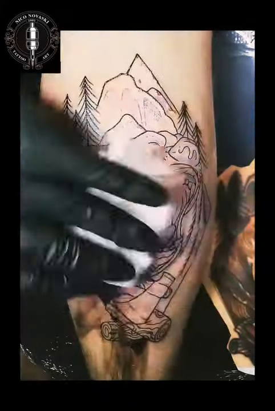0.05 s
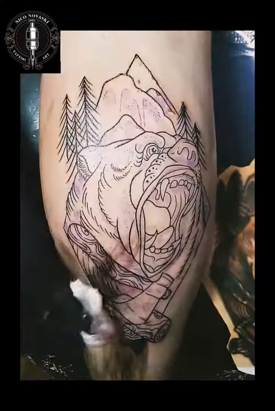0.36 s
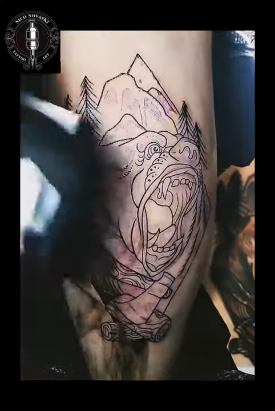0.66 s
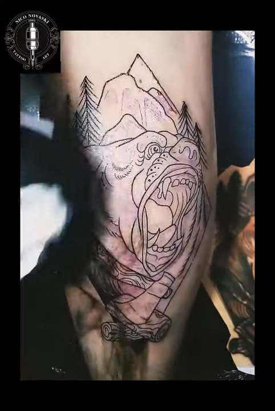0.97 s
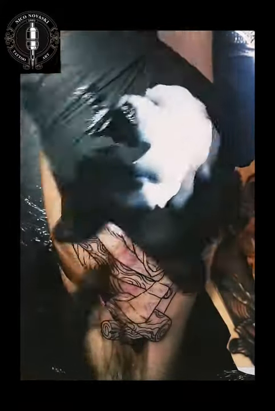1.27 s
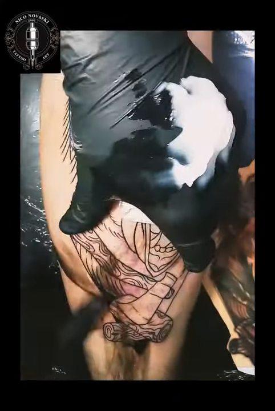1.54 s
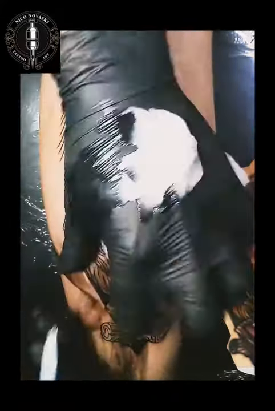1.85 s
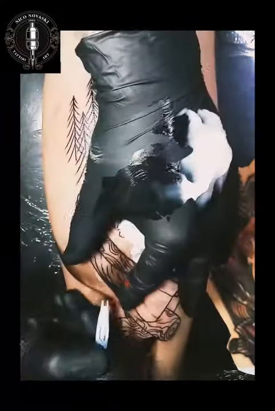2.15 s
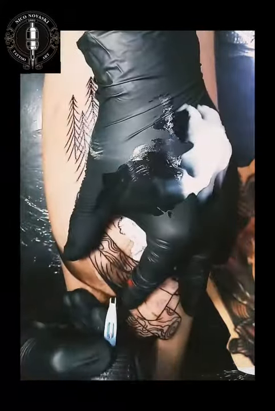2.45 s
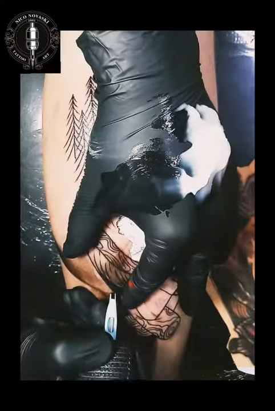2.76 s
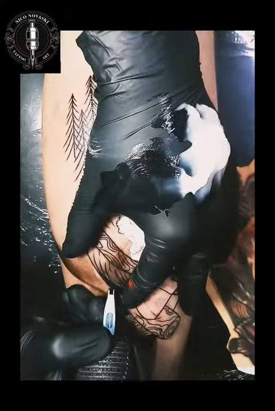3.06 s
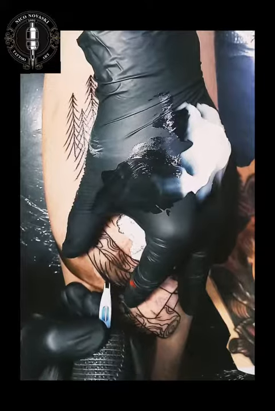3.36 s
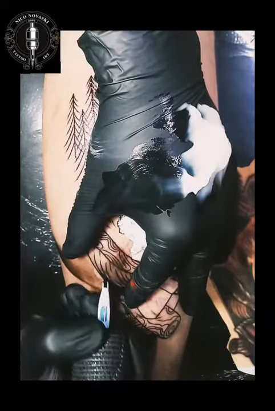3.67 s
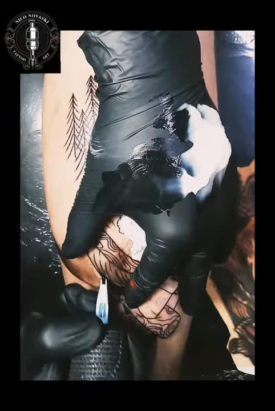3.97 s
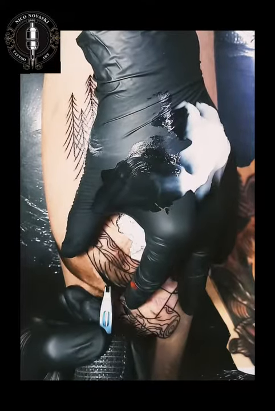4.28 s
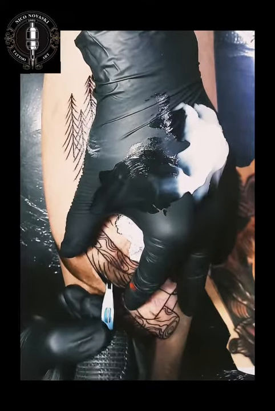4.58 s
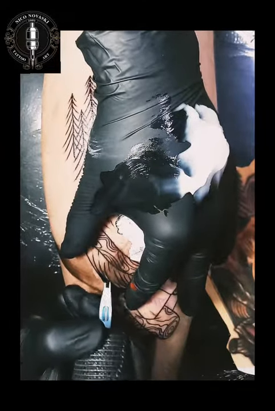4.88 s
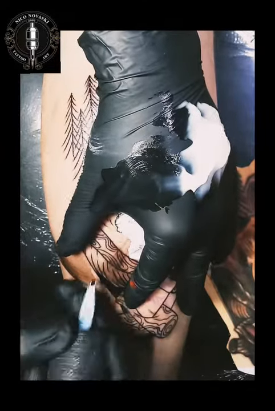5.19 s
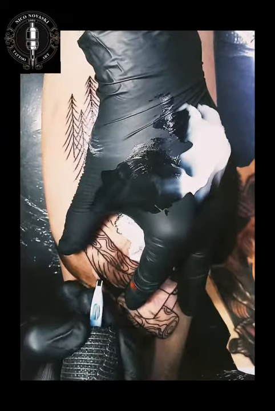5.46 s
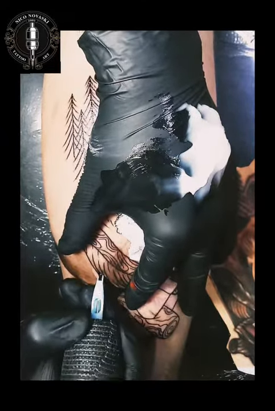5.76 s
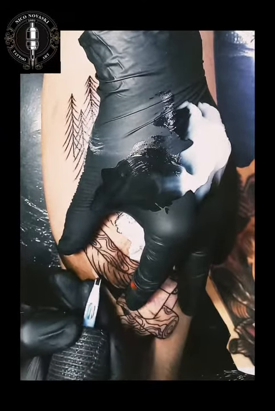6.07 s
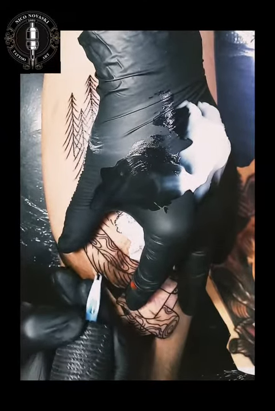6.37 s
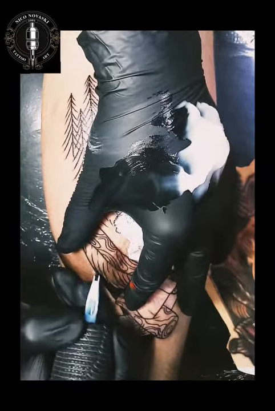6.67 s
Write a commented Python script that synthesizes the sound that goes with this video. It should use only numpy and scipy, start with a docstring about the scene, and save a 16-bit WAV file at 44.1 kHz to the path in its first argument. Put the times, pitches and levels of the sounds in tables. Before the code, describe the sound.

Close, continuous buzz of a coil tattoo machine with a ringing whine, turning slightly rougher whenever the needle presses into skin.

```python
"""A small room, where a coil tattoo machine buzzes: beside the microphone, held up, then on the skin.
Its armature strikes the frame about 96 times a second and rings it in the treble, and the colour
shifts as the hand turns and carries it. Skin shortens the stroke, so the buzz turns faster and
rougher with each dab of the needle. Underneath are soft bumps on the bench, faint air and mains hum."""
import sys
import numpy as np
from scipy import signal
from scipy.fft import rfft, irfft
from scipy.io import wavfile
from scipy.ndimage import uniform_filter1d

SR = 44100
rng = np.random.default_rng(int(sys.argv[2]) if len(sys.argv) > 2 else 0)


def materialize(psi):
    """Save the field psi as 16-bit PCM at rate SR to the path in sys.argv[1].

    A 1-D psi becomes a single channel; in a 2-D psi each row is a channel.
    """
    bounded = np.clip(np.atleast_2d(psi).T, -1, 1)
    quanta = np.round(bounded * 32767).astype(np.int16)
    wavfile.write(sys.argv[1], SR, quanta)


N = 301203
TIME = np.arange(N) / SR


def gain_of(db):
    """Decibels to gain."""
    return 10 ** (np.asarray(db) / 20)


def unit_rms(x):
    """Scales to an rms of one."""
    return x / np.sqrt(np.mean(x ** 2) + 1e-20)


def curve_at(points, hz):
    """Reads an EQ curve of (Hz, dB) points on a log-frequency axis."""
    point_hz, db = np.transpose(points)
    return np.interp(np.log(hz + 1), np.log(point_hz + 1), db)


def coloured_noise(points):
    """White noise through an EQ curve."""
    gain = gain_of(curve_at(points, np.fft.rfftfreq(N, 1 / SR)))
    return irfft(rfft(rng.standard_normal(N)) * gain, N)


def bandpass(x, low_hz, high_hz):
    """A gentle band filter."""
    return signal.sosfilt(signal.butter(2, [low_hz, high_hz], "band", fs=SR, output="sos"), x)


def bell(x, centre, width):
    """A smooth hump of height one."""
    return np.exp(-((x - centre) / width) ** 2)


def gate(t, start, end, ramp):
    """One between start and end, with sloping edges."""
    return np.clip(.5 + (t - start) / ramp, 0, 1) - np.clip(.5 + (t - end) / ramp, 0, 1)


def minimum_phase(gain):
    """Gives a magnitude the phase of something that rings only after it is struck."""
    log_gain = np.log(np.maximum(gain, 1e-5))
    mirrored = np.r_[log_gain, log_gain[-2:0:-1]]
    return np.exp(np.conj(signal.hilbert(mirrored)))[:len(gain)]


# The armature stumbles now and then. Each row: time in seconds, how early in ms, level change in dB.
STUMBLES = [(.859, 1.35, -2), (.870, 1.5, -1.5), (1.675, 1.35, -5), (3.697, 1.8, -4), (4.057, 0.14, -6),
            (4.097, 1.8, 0.5), (6.706, 1.8, -3)]

def armature_blows(cycles, load, jitter_ms=0.0057, skin_jitter_ms=0.014, drift_ms=0.018):
    """One sharp blow a cycle; skin roughens their timing and evens out their force."""
    times = np.interp(np.arange(np.ceil(cycles[0]), cycles[-1]), cycles, TIME)
    pressed = np.interp(times, TIME, load)
    jitter, drift, force = rng.standard_normal((len(times), 3)).T
    late_ms = jitter * (jitter_ms + skin_jitter_ms * pressed)
    late_ms += drift_ms * unit_rms(uniform_filter1d(drift, size=5))
    times += late_ms / 1000
    force_db = force * (0.8 - 0.69 * pressed)
    for at, early_ms, db in STUMBLES:
        nearest = np.argmin(abs(times - at))
        times[nearest] -= early_ms / 1000
        force_db[nearest] += db
    # a windowed sinc lets each blow land between samples
    taps = np.round(times * SR).astype(int)[:, None] + np.arange(-10, 11)
    offset = taps - times[:, None] * SR
    blows = gain_of(force_db)[:, None] * np.sinc(offset) * np.sinc(offset / 10)
    return np.bincount(np.clip(taps, 0, N - 1).ravel(), blows.ravel(), N)


def needle_scrape(cycles, load, fade_cycles=0.077):
    """The needle bar rubs in its tube after each blow, harder when it is in the skin."""
    grit = coloured_noise([(3500, 10.5), (7000, -6.5), (9000, 10), (15000, 9.5)])
    rub = unit_rms(0.24 + np.exp(-(cycles % 1) / fade_cycles))
    return grit * rub * (gain_of(-48) + gain_of(-49) * load)


def knock_cluster(pattern, start_ms, fade_ms):
    """A dying cluster of small knocks, as a spectrum of mean power one."""
    age_ms = np.arange(len(pattern)) / SR * 1000 - start_ms
    knocks = pattern * (age_ms > 0) * np.exp(-abs(age_ms) / fade_ms)
    return rfft(knocks / np.linalg.norm(knocks))


# The frame's metallic rings. Each row: pitch in Hz, width in Hz, then relative level in dB
# for each grip: beside the microphone, held up, on the skin.
FRAME_MODES = [(974, 47, -20.5, -40, -22), (1128, 160, -25.5, -29, -24.5), (1435, 56, -22, -40, -45),
               (2328, 146, -27, -20.5, -26.5), (2483, 53, -19, -26, -27), (3260, 740, -18, -25, -41),
               (3330, 144, -25, -19, -17.5), (4740, 270, -4, -11, -6.5), (5234, 520, -5.5, -14.5, -12.5),
               (5933, 88, 3, -8.5, 1), (6510, 990, -30, -6, -28), (6832, 720, -1, -1, -4),
               (10309, 240, -9, -16.5, -24), (11020, 790, -13, -18, -21.5), (14700, 280, -10.5, -16, -30),
               (15350, 2600, -12.5, -18.5, -18.5)]
# The bare crack of a stroke. Each row: frequency in Hz, relative level in dB.
CRACK_EQ = [(60.0, -51), (250.0, -40.5), (600.0, -36.5), (1900.0, -32), (3000.0, -36.5), (3400.0, -20),
            (5600.0, -17), (7300.0, -30.5), (7900.0, -22), (9500.0, -18), (12200.0, -25.5),
            (13300.0, -32.5), (16000.0, -26.5)]
# The mix of a stroke in those three grips. Each row: start in seconds, trims in dB for crack, bounce,
# rattle, room and spring click, then the click's delay in ms.
GRIPS = [(0, -3, -6.5, 4.5, 0, -7.5, 5.3), (0.631, -4.5, 2, -2, -0.5, 1.5, 7.9),
         (2.05, 0.5, 1.5, -1, -1, 6, 8.2)]

def stroke_ring(grip_mix, patterns):
    """One stroke: blow, bounce, rattle, room echoes and spring click, all through the frame's modes."""
    _, crack_db, bounce_db, rattle_db, room_db, spring_db, spring_ms = grip_mix @ np.array(GRIPS)
    hz = np.fft.rfftfreq(patterns.shape[1], 1 / SR)

    def eq(db, points):
        return gain_of(db + curve_at(points, hz))

    power = eq(crack_db, CRACK_EQ) ** 2
    for mode_hz, width, *mode_db in FRAME_MODES:
        power += grip_mix @ gain_of(mode_db) ** 2 / (1 + (2 * (hz - mode_hz) / width) ** 2) ** 2
    blow = eq(0, [(7000, 1), (9500, 2.5), (14000, -3)])
    bounce = knock_cluster(patterns[0], start_ms=.3, fade_ms=0.43)
    bounce *= eq(bounce_db, [(7000, 2), (9000, 1.5), (15000, -1.5)])
    rattle = knock_cluster(patterns[1], start_ms=.4, fade_ms=3.07)
    rattle *= eq(rattle_db, [(6500, 0), (9000, -14.5), (15000, -11)])
    echoes = knock_cluster(patterns[2], 1.3, 21.2) + 0.63 * knock_cluster(patterns[3], 7.6, 47)
    echoes *= eq(room_db, [(800, 2.5), (2000, 4), (5000, -11), (10000, -3.5)])
    spring = knock_cluster(patterns[0], start_ms=spring_ms - .3, fade_ms=1.04)
    spring *= eq(spring_db, [(6500, -9.5), (10500, -11), (14500, -3)])
    knocks = blow + bounce + rattle + echoes + spring
    # the knocks share out the stroke's energy in time; the modes decide its colour
    knock_power = uniform_filter1d(abs(knocks) ** 2, size=25)
    return irfft(knocks * minimum_phase(np.sqrt(power / knock_power)))


# The hand carries the machine. Each row: time in seconds, distance in wavelengths of the ring.
HAND_PATH = [(0, -0.5), (.55, 0.22), (.9, 1), (1.8, 4.5), (2.4, 9), (2.9, 10), (5.1, 10.5), (5.35, 12),
             (5.65, 12.5), (6.1, 14), (6.83, 16)]

def carried_frame(drive, size=4096):
    """Rings the frame as it moves: the grip changes, and each wavelength of travel renews the echoes."""
    hop = size // 2
    places = rng.standard_normal((20, 4, size))
    padded, out = np.pad(drive, (hop, size)), np.zeros(N + 4 * size)
    for at in range(0, N + hop, hop):
        now = at / SR
        lifted = np.clip(.5 + (now - GRIPS[1][0]) / 0.17, 0, 1)
        landed = np.clip(.5 + (now - GRIPS[2][0]) / 0.35, 0, 1)
        grip_mix = np.array([1 - lifted, lifted * (1 - landed), landed])
        distance = np.interp(now, *np.transpose(HAND_PATH))
        place, blend = divmod(np.clip(distance, 0, len(places) - 2), 1.0)
        patterns = (1 - blend) * places[int(place)] + blend * places[int(place) + 1]
        grain = padded[at:at + size] * signal.windows.hann(size, sym=False)
        out[at:at + 2 * size - 1] += signal.fftconvolve(grain, stroke_ring(grip_mix, patterns))
    return out[hop:hop + N]


# Skin damps the frame. Each row: frequency in Hz, gain in dB at firm pressure.
SKIN_DAMPING = [(1000, -3), (2000, -1.5), (3500, -.8), (4700, -0.5), (5400, -3), (6000, 0.5), (7000, -1),
                (9000, -1.75), (15000, -1.5)]
# The whine, the frame's strongest rings, rides the turning hand. Each row: time in seconds, gain in dB.
WHINE_RIDE = [(0, 1), (.3, -0.5), (1.35, 0), (2.2, -.5), (2.6, 0), (3.5, -5.5), (4.9, -4.5), (5.15, -5),
              (5.3, -1.5), (6.1, 3.5), (6.83, 1)]
# A ring stands out or sinks while the frame is held a certain way.
# Each row: start and end in seconds, centre and width in Hz, gain in dB.
HELD_ANGLES = [(0, 0.636, 2310, 190, 9.5), (0, .6, 4840, 450, 1), (0.71, 2.38, 2300, 240, -4.5),
               (0.693, 1.334, 4200, 650, -6.5), (1.358, 2.122, 5460, 402.5, 4.5),
               (2.41, 2.788, 1550, 900, 2.5), (2.5, 5.92, 5420, 353, -7.5), (5.274, 5.964, 6450, 210, 5),
               (6.015, 6.353, 2420, 220, 2.5), (6.01, 6.9, 5350, 450, 1.5)]
# A ring flares or drops out as the frame swings past the microphone.
# Each row: midpoint and length in seconds, centre and width in Hz, gain in dB.
SWINGS = [(0.644, .07, 5200, 700, -5), (.77, 0.19, 4960, 550, 9), (0.777, 0.084, 7060, 600, -1.5),
          (0.794, 0.098, 13900, 5000, -4), (0.964, 0.078, 4800, 300, 11.5), (1.075, .11, 4800, 544.6, 0),
          (1.21, 0.11, 4850, 300, 10), (1.27, .09, 5750, 450, -2), (1.935, 0.17, 4940, 300, 10),
          (1.96, 0.15, 3860, 446, -7), (2.247, 0.38, 4930, 400, -5.5), (2.53, 0.068, 6200, 1800, 3),
          (4.32, 0.11, 6070, 1500, 3), (5.213, 0.09, 5730, 1500, 4.5), (6.105, 0.1, 6300, 1100, 2.5)]

def hand_and_skin_eq(frame, load, swirl_db=1.9, ramp_s=0.02):
    """Skin damps the rings; the turning hand makes them swell, fade and swirl."""
    hz, t, spectra = signal.stft(frame, SR, nperseg=512, noverlap=384)
    db = np.outer(curve_at(SKIN_DAMPING, hz), np.interp(t, TIME, load))
    db += np.outer(bell(hz, centre=6860, width=320), np.interp(t, *np.transpose(WHINE_RIDE)))
    for start, end, centre, width, boost in HELD_ANGLES:
        db += boost * np.outer(bell(hz, centre, width), gate(t, start, end, ramp_s))
    for at, length, centre, width, boost in SWINGS:
        db += boost * np.outer(bell(hz, centre, width), bell(t, at, length / 2))
    # the colour swirls in patches while the machine travels through the air
    patch_shape = np.outer(np.hanning(7), np.hanning(45))
    patches = signal.fftconvolve(rng.standard_normal(spectra.shape), patch_shape, "same")
    db += swirl_db * unit_rms(patches) * gate(t, start=.62, end=2.3, ramp=ramp_s)
    return signal.istft(spectra * gain_of(db), nperseg=512, noverlap=384)[1][:N]


# The buzz with the needle in the air; the coils slow a little as they run.
# Each row: time in seconds, strokes per second.
FREE_SPEED = [(0, 95.86), (1.9, 95.82), (2.4, 95.63), (6.83, 95.38)]

def tattoo_machine(frame_db=20, load_rise_hz=2.7):
    """Strokes ring the frame; under load they come faster and the skin drums along."""
    load = needle_pressure()
    stroke_hz = np.interp(TIME, *np.transpose(FREE_SPEED)) + load_rise_hz * load
    cycles = np.cumsum(stroke_hz) / SR - .55
    blows = armature_blows(cycles, load)
    frame = carried_frame(blows + needle_scrape(cycles, load))
    frame = hand_and_skin_eq(frame, load)
    # the small frame radiates little bass
    frame = signal.sosfilt(signal.butter(2, 430, "high", fs=SR, output="sos"), frame)
    return gain_of(frame_db) * frame + loose_parts(blows) + skin_drum(blows, load)


# A bed of still room air. Each row: frequency in Hz, relative level in dB.
AIR_EQ = [(20, 3.5), (45, -3), (100, 5), (170, 0.5), (500, -6.5), (1500, -2.5), (5000, -20), (16000, -49)]

def room_tone(air_db=-62, mains_db=-75, octave_db=-79):
    """Faint air, with 50 Hz mains hum and its octave."""
    phase = 2 * np.pi * 50 * TIME
    hum = np.sqrt(2) * (gain_of(mains_db) * np.sin(phase) + gain_of(octave_db) * np.sin(2 * phase))
    return gain_of(air_db) * unit_rms(coloured_noise(AIR_EQ)) + hum


# Soft, dull thuds. Each row: midpoint in seconds, level in dB, centre in Hz, length in seconds.
BENCH_BUMPS = [(0.11, -52.5, 216, 0.36), (4.65, -52.5, 179, 0.07), (4.773, -53.5, 314, 0.09),
               (6.456, -58, 400, 0.085)]

def bench_bumps():
    """Hands and arms push on the bench's padding, each a short swell of low noise."""
    out = np.zeros(N)
    for at, db, hz, length in BENCH_BUMPS:
        thud = bandpass(rng.standard_normal(N), hz / 1.84, hz * 1.78)
        out += gain_of(db) * unit_rms(thud) * bell(TIME, at, length / 2)
    return out


# Loose parts hum along while the machine is held up.
# Each row: start and end in seconds, pitch and half-width in Hz, level in dB.
LOOSE_PARTS = [(.66, 1.86, 753, 59, -51), (1.2, 1.84, 2340, 49.6, -50)]

def loose_parts(blows, ramp_s=0.034):
    """Each loose part is one narrow resonance, shaken by the strokes."""
    out = np.zeros(N)
    for start, end, hz, half_width, db in LOOSE_PARTS:
        hum = unit_rms(bandpass(blows, hz - half_width, hz + half_width))
        out += gain_of(db) * gate(TIME, start, end, ramp_s) * hum
    return out


# The needle digs into the skin. Each row: start and end in seconds, pressure (1 is firm),
# share by which it eases between dabs.
NEEDLE_PRESSES = [(2.882, 3.181, .56, 0), (3.185, 4.232, 1.109, .6), (4.451, 4.841, .841, 0),
                  (4.841, 5.128, 1.003, 0), (5.692, 5.9, .885, 0), (6.388, 6.501, .947, 0),
                  (6.593, 6.692, 1.133, 0), (6.77, 6.9, 1.083, 0)]

def needle_pressure(dabs_per_s=7.6, ramp_s=.05, tremor_depth=.1, tremor_hz=9):
    """How hard the needle bears on the skin: wavering in a line, pulsing in a run of dabs."""
    load = np.zeros(N)
    for start, end, pressure, ease in NEEDLE_PRESSES:
        between_dabs = np.sin(np.pi * dabs_per_s * (TIME - start)) ** 2
        load += pressure * gate(TIME, start, end, ramp_s) * (1 - ease * between_dabs)
    tremor_band = bell(np.fft.rfftfreq(N, 1 / SR), tremor_hz, tremor_hz / 2)
    tremor = irfft(rfft(rng.standard_normal(N)) * tremor_band, N)
    return load * (1 + tremor_depth * unit_rms(tremor))


def skin_drum(blows, load, level_db=-58, centre_hz=420):
    """The skin drums under the blows, louder the harder the needle presses."""
    return gain_of(level_db) * load * unit_rms(bandpass(blows, centre_hz / 1.21, centre_hz * 1.19))


def scene():
    """Everything reaches one microphone, the same in both channels."""
    return np.tile(tattoo_machine() + bench_bumps() + room_tone(), (2, 1))


def record(dry, cutoff_hz=15830):
    """A steep low-pass trims the very top."""
    lowpass = signal.firwin(1023, cutoff_hz, window=("kaiser", 9), fs=SR)
    return signal.oaconvolve(dry, lowpass[None], "same")


dry = scene()
out = record(dry)
materialize(out)
```